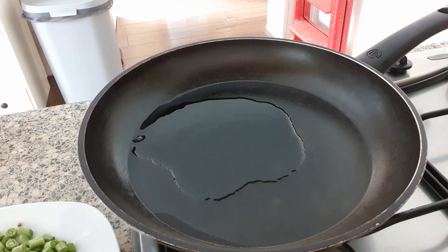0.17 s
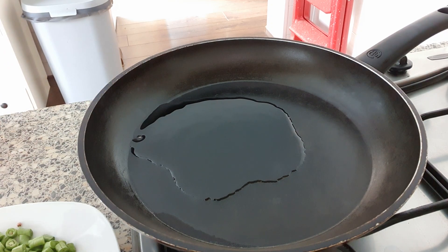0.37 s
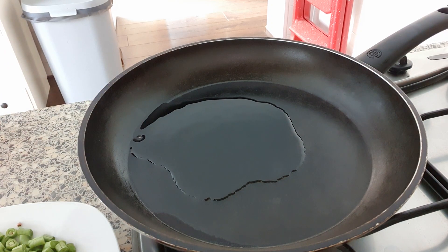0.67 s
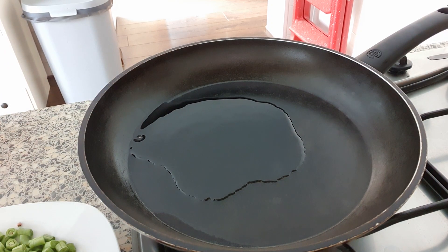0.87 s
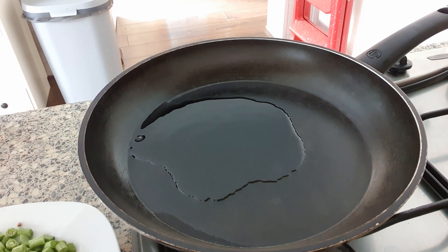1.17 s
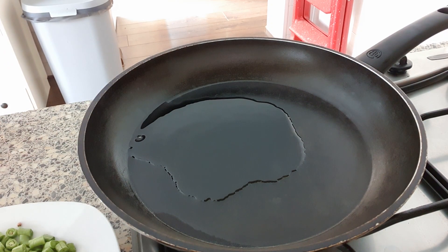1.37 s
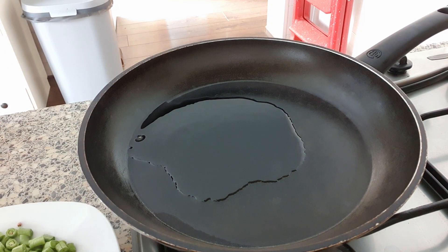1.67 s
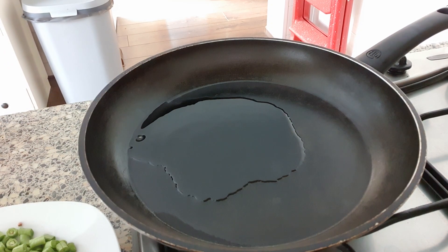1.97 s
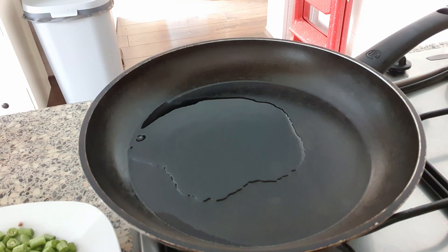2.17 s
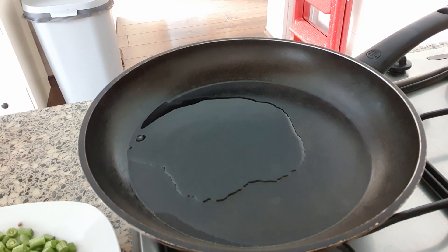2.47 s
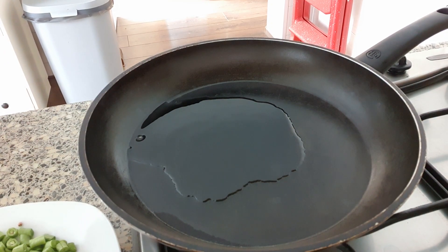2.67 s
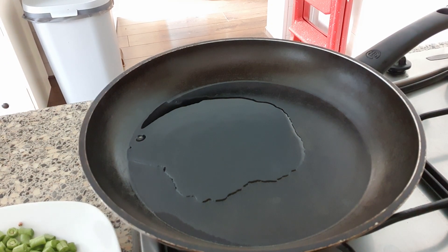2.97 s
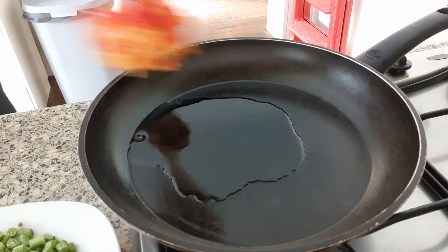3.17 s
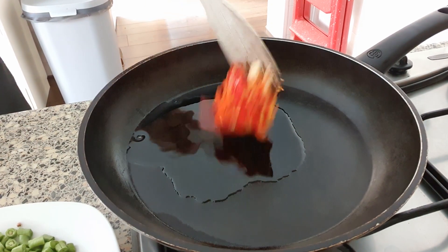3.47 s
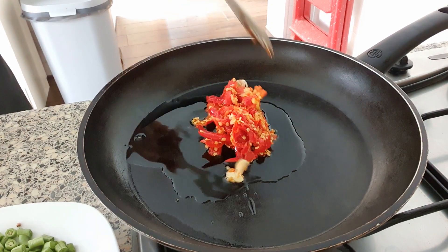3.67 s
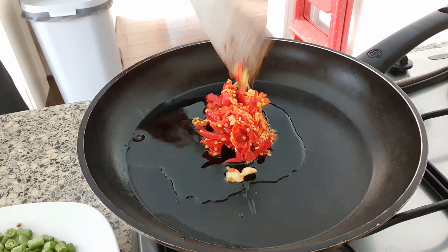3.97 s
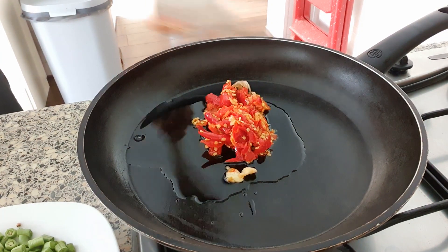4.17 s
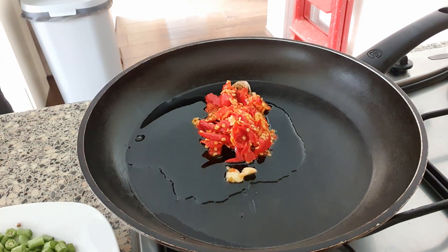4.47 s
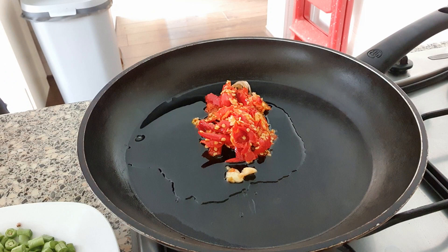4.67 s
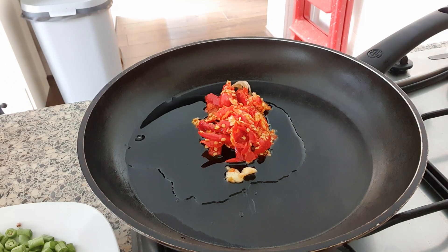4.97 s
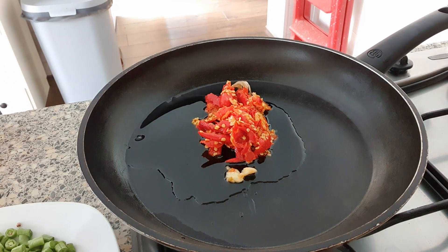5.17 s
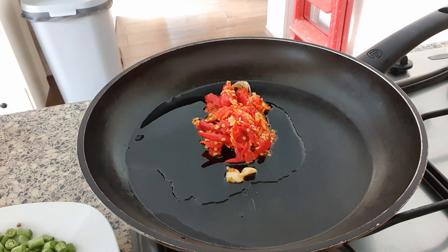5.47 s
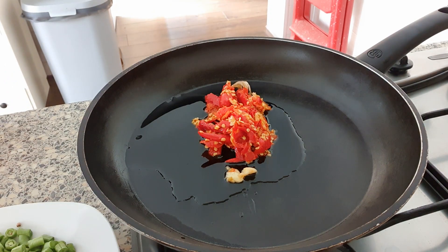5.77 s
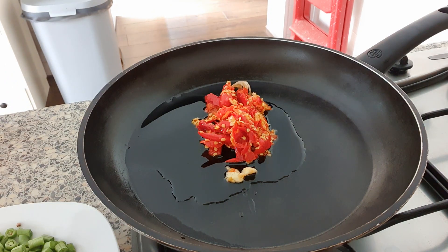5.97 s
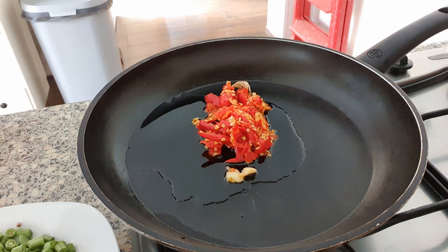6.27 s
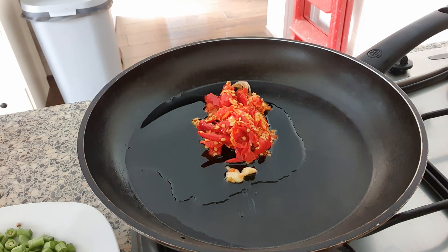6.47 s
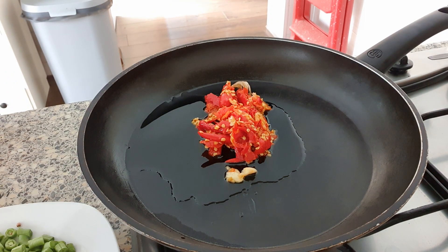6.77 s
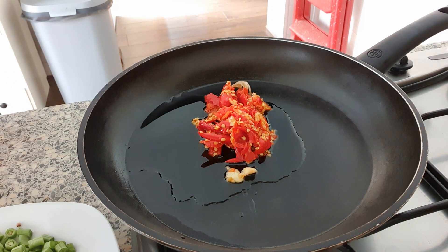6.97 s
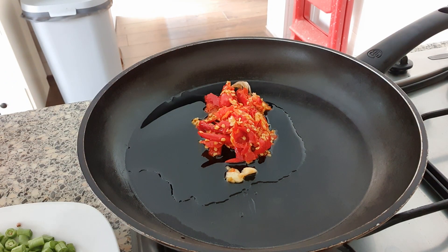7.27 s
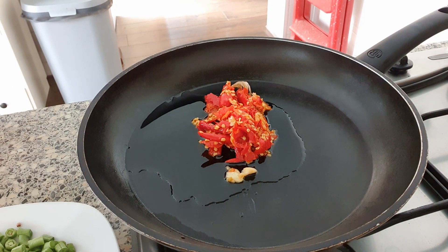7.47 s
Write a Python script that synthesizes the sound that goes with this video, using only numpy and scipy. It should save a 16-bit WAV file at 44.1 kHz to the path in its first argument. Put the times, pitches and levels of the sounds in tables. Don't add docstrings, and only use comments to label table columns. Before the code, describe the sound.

Right at the start a heavy wooden bang breaks into a fast clatter, loud and close. Soft scrapes and distant small taps trail off, leaving thin, coloured gas hiss and a low building rumble. Near the end come about a dozen quick dry knocks with hollow pock-like tones, clinks and brief spoon scrapes, a little left of centre. Two light rubbing strokes fade into hiss. Close stereo pickup in a small reflective kitchen.

```python
import sys
import numpy as np
from scipy import signal
from scipy.fft import rfft, irfft
from scipy.io import wavfile
from scipy.ndimage import uniform_filter1d

SR = 44100
rng = np.random.default_rng(int(sys.argv[2]) if len(sys.argv) > 2 else 0)


def ratio(d):
    e = np.asarray(d, float) / 20
    return 10 ** e


def unload_wav(signal):
    wavfile.write(
        sys.argv[1],
        SR,
        np.round(np.clip(np.atleast_2d(signal).T, -1, 1) * 32767).astype(np.int16),
    )


N = 336042


def evened(x):
    return x / np.sqrt(np.mean(x ** 2) + 1e-20)


def peaked(x, db):
    return ratio(db) * x / abs(x).max()


def read(points, hz, column=1):
    table = np.transpose(points)
    return np.interp(np.log(hz + 1), np.log(table[0] + 1), table[column])


def along(rows, t):
    return np.interp(t, *np.transpose(rows))


def panned(left_minus_right_db):
    return ratio([[left_minus_right_db / 2], [-left_minus_right_db / 2]])


def add(mix, s, sound):
    part = mix[..., max(round(s * SR), 0):][..., :sound.shape[-1]]
    part += sound[..., :part.shape[-1]]


def rings(modes):
    t = np.arange(12000) / SR
    return sum(ratio(db - 60 * t / t60) * np.sin(2 * np.pi * hz * t) for hz, db, t60 in modes)


def wander(count, size):
    return evened(uniform_filter1d(uniform_filter1d(rng.standard_normal(count), size), size))


def pair(shape, alike):
    a, b, c, d = rng.standard_normal((4,) + shape)
    left, other = a + 1j * b, c + 1j * d
    return np.array([left, alike * left + np.sqrt(1 - np.minimum(abs(alike), 1) ** 2) * other])


# (frequency [Hz], width [Hz], left level [dB], right level [dB],
# left-right likeness [0-1], left lead [rad])
JETS = [(644, 94, -87.5, -87, 0.91, 1.26), (1734, 180, -80, -88.5, 0.87, 0.94),
        (3652, 221, -77, -86, 0.39, 2), (5730, 230, -88.5, -96, 0.71, 0.8),
        (6555, 224, -75.5, -81, 0.63, -1.46), (8430, 660, -93.5, -90, 0.31, 0.6),
        (9230, 176, -99, -82, 0.26, 0.5), (9950, 190, -101, -89.5, .2, 7), (10850, 150, -98, -89, 0.84, -3),
        (12320, 160, -87, -87, 0.72, -2.5), (14200, 500, -91, -102.5, .6, 6),
        (14740, 150, -81, -79, 0.65, -5), (15550, 143, -102, -119, 0.61, -13)]
# (frequency [Hz], left level [dB], right level [dB])
VALLEYS = [(301, -93.5, -104), (1100, -100, -106), (2720, -101, -102), (5130, -97, -100), (7500, -99, -99),
           (9680, -105, -98.5), (11800, -102, -97), (13800, -101, -101), (15500, -99, -99)]
# (time [s], gain [dB])
GAIN = [(0, -0.5), (.25, -2), (1.25, -5), (1.82, 1), (2.1, -0.25), (5.4, 0), (7.62, 0)]


def burner():
    hiss_db = -46.5
    frames, hz = N // 128 + 5, np.fft.rfftfreq(512, 1 / SR)
    power = ratio([read(VALLEYS, hz, column=1), read(VALLEYS, hz, column=2)]) ** 2
    shared = np.zeros(len(hz), complex)
    for centre, width, left_db, right_db, alike, lead in JETS:
        hump = (1 + ((hz - centre) / width) ** 2) ** -2
        power += ratio([[left_db], [right_db]]) ** 2 * hump
        shared += ratio(left_db + right_db) * hump * alike * np.exp(-1j * lead)
    likeness = shared / np.sqrt(power[0] * power[1])
    z = pair((len(hz), frames), likeness[:, None]) * np.sqrt(power)[:, :, None]
    patches = uniform_filter1d(rng.standard_normal((len(hz), frames)), size=6, axis=0)
    patches = evened(uniform_filter1d(patches, size=16, axis=1))
    z *= ratio(0.7 * patches + 0.72 * wander(frames, size=8)) * (hz > 200)[:, None]
    hiss = evened(signal.istft(z, nperseg=512, noverlap=384)[1][:, :N])
    return hiss * ratio(hiss_db + along(GAIN, np.arange(N) / SR))


# (time [s], peak level [dB], contact [ms], crack level [dB])
DOOR = [(.002, -19.5, 3, -34), (0.033, -13.5, 4.4, -40), (0.0467, -10.5, 1.3, -20.5), (.051, -2, 1.56, -34),
        (0.057, -14, 2, -40), (0.0689, -7.5, 1.22, -42), (.097, -5.5, 1.63, -29), (.104, -13.5, 1.95, -26),
        (0.129, -14, 1.5, -38), (0.14, -23.5, 1.4, -37), (0.189, -17, 1.37, -37), (0.241, -32, 4, -47),
        (.33, -38.5, 2.7, -39)]
# (time [s], peak level [dB], contact [ms], crack level [dB])
SPOON = [(4.927, -25.5, 2.1, -43.5), (5.004, -25.5, 1.63, -27), (5.2407, -18, 1.4, -45),
         (5.249, -29, 2, -50), (5.29, -23.5, 3.5, -33), (5.475, -19, 0.53, -28), (5.51, -27, 2.8, -56),
         (5.566, -26, 1.8, -56), (5.6, -32, 2.8, -35), (5.768, -14.5, 0.84, -8), (5.819, -21, 1.4, -43),
         (5.846, -22, 1.84, -31)]
# (time [s], peak level [dB], contact [ms])
TAPS = [(.585, -44.5, 2.7), (0.845, -40.5, 1.8), (.988, -44, 1.4), (1.729, -44.5, 3.7), (1.853, -39, 7.6),
        (2.17, -46, 1.6), (2.687, -43, 3.9), (2.931, -40, 1.7), (6.457, -42, 3.9)]
# (frequency [Hz], level [dB], t60 [s])
WORKTOP = [(111, -17, 0.075), (151.2, -3, 0.15), (222, -3.5, 0.1), (314, -5, 0.085), (371.7, 3.5, 0.058),
           (476.4, -7.5, 0.22), (697, -3.5, 0.12), (790, -12, 0.16), (860, 1.5, 0.1)]
# (frequency [Hz], level [dB])
CRACK = [(600, -47), (1000, 11), (1400, -1.5), (2000, 8.5), (2600, 3), (3500, 3), (4800, -6.5), (6500, -22),
         (9000, -11), (12000, -30), (16000, -55)]


def thuds():
    door_pan_db, tap_pan_db, spoon_pan_db = 3.5, 2, 3
    tap_crack_db, crack_loss_db_per_ms = -3, 2.5
    right_delay_s = 0.00037
    out, t = np.zeros((2, N)), np.arange(4096) / SR
    colour = ratio(read(CRACK, np.fft.rfftfreq(4096, 1 / SR)))
    body = 0.0055 * rings(WORKTOP) + signal.unit_impulse(12000)
    band = signal.butter(2, [85, 1000], "bandpass", fs=SR, output="sos")
    blows = [(*row, door_pan_db) for row in DOOR] + [(*row, spoon_pan_db) for row in SPOON]
    for s, db, contact_ms in TAPS:
        crack_db = db + tap_crack_db - crack_loss_db_per_ms * contact_ms
        blows.append((s, db, contact_ms, crack_db, tap_pan_db))
    for s, db, contact_ms, crack_db, pan_db in blows:
        push = np.hanning(round(contact_ms * SR / 1000) + 3)
        thud = peaked(signal.sosfilt(band, signal.oaconvolve(push, body)), db)
        add(out[0], s, thud * ratio(pan_db / 4))
        add(out[1], s + right_delay_s, thud / ratio(pan_db / 4))
        burst = irfft(rfft(rng.standard_normal((2, 4096))) * colour)
        burst *= (1 - np.exp(-t / 0.00014)) * (np.exp(-t / 0.0041) + 0.13 * np.exp(-t / 0.019))
        add(out, s, peaked(burst, crack_db) * panned(pan_db))
    return out


# (time [s], peak level [dB], hardness [dB/octave])
WALL_HITS = [(.048, -23.5, -6.5), (.095, -43, 1.5), (5.004, -33.5, 4), (5.242, -45, -12), (5.29, -38, -6),
             (5.477, -26.5, -11), (5.484, -32, -24), (5.519, -34.5, -19), (5.767, -18.5, 11),
             (5.783, -31, -12), (5.83, -33, 7)]
# (frequency [Hz], level [dB], t60 [s])
CLINK = [(825, -5.5, 0.059), (1120, -4, 0.086), (1350, 3, 0.14), (1900, 14.5, 0.036), (2126, 5, 0.13),
         (2360, -13, 0.074), (2830, -14, 0.067), (3036, 2.5, 0.08), (3250, 2, 0.057), (4130, 0, 0.071),
         (4770, -17, .06), (5600, -11.5, 0.047)]


def wall():
    out, contact = np.zeros((2, N)), np.exp(-np.arange(500) / SR / 0.0023)
    for s, db, hard_db in WALL_HITS:
        modes = [(hz, level + hard_db * np.log2(hz / 1900), t60) for hz, level, t60 in CLINK]
        clink = rings(modes)
        for side in out:
            grit = contact * rng.standard_normal(500)
            add(side, s, peaked(signal.oaconvolve(clink, grit), db))
    return out * panned(3)


# (time [s], peak level [dB], time to peak [s], left minus right [dB])
AIR = [(.049, -12, 0.0037, 6.5), (.094, -28, 0.011, 8), (.844, -43.5, .006, 13), (4.925, -41, 0.0096, 10),
       (5.003, -29.5, .011, 5), (5.2415, -28, 0.0097, 11), (5.481, -11, .012, 9), (5.545, -24.5, 0.0077, 0),
       (5.59, -34, .0078, -4), (5.769, -17, .012, -2), (5.81, -27, 0.014, -3), (5.84, -28, 0.0084, 7),
       (6.0, -49.5, 0.02, 7), (6.04, -42.5, 0.013, 3), (6.19, -53, 0.0046, 3.5), (6.29, -55, 0.0091, 5),
       (6.4, -54, 0.014, 5)]
# (time [s], peak level [dB], frequency [Hz])
PANELS = [(.002, -35.5, 630), (.048, -19, 105), (.05, -31, 85), (.05, -19, 790), (.062, -20.5, 713),
          (.096, -30, 860), (.585, -47.5, 151), (.844, -44.5, 474), (.988, -48, 650), (.988, -49.5, 477),
          (1.844, -44, 99.5), (2.17, -52, 596), (2.69, -53.5, 690), (2.93, -53, 710), (3.545, -55, 760),
          (5.476, -23.5, 567), (5.5, -39, 143), (5.56, -31, 145.6), (5.769, -25.5, 825), (6.465, -47, 100),
          (7.129, -52, 103)]


def notes():
    air_hz, panel_pan_db = 586.4, 0.5
    panel_rise_s, rise_law = 0.006, -0.67
    out, t = np.zeros((2, N)), np.arange(8000) / SR
    swells = [(s, db, air_hz, rise, pan_db) for s, db, rise, pan_db in AIR]
    for s, db, hz in PANELS:
        swells.append((s, db, hz, panel_rise_s * (hz / 600) ** rise_law, panel_pan_db))
    for s, db, hz, rise, pan_db in swells:
        u = t / (rise * np.array([[1], [.75]]))
        note = u * np.exp(1 - u) * np.sin(2 * np.pi * hz * t - np.array([[0], [.7]]))
        add(out, s, note * ratio(db) * panned(pan_db))
    return out


# (time [s], length [s], level [dB], brightness [dB/octave], top [Hz])
SCRAPES = [(0.046, 0.16, -48.5, -18.5, 6000), (0.209, 0.15, -56.5, 1, 4960),
           (0.303, 0.16, -50.5, -1.5, 5600), (0.584, 0.14, -57.5, 3, 5000), (2.897, 0.1, -60, -1.5, 6000),
           (3.525, .08, -52.5, -.8, 13000), (4.919, 0.03, -50.5, -1, 6000),
           (4.982, 0.083, -40.5, -2.5, 12000), (5.27, .11, -44.5, -1, 12000),
           (5.561, 0.081, -49, -2.5, 9000), (5.804, .1, -41, -4.5, 10000), (5.869, 0.33, -52, 1.5, 5540),
           (6.1, 0.34, -54.5, 2.5, 5460)]
# (frequency [Hz], level [dB], t60 [s])
BOWL = [(590.3, -7, 0.093), (1391, -15.5, 0.12), (1910, -26, 0.03), (1150, -42, 0.13)]


def scrapes():
    clump_db = 3
    ring_db, ring_slope = -40.5, 1.41
    out, bowl = np.zeros((2, N)), rings(BOWL)
    for s, length, db, tilt_db, top_hz in SCRAPES:
        u = np.linspace(0, 1, round(length * SR))
        stroke = np.sin(np.pi * u ** .6) ** 1.08
        slip_db = 1.5 * rng.exponential(1, len(u)) + clump_db * wander(len(u), size=120)
        slips = rng.standard_normal((2, len(u))) * ratio(slip_db) * stroke
        hz = np.fft.rfftfreq(len(u), 1 / SR)
        colour = ratio(tilt_db * np.log2(hz / 3000 + 0.014))
        colour = colour / (1 + (1330 / (hz + 1)) ** 8) / (1 + (hz / top_hz) ** 4)
        add(out, s, evened(irfft(rfft(slips) * colour, len(u))) * ratio(db) * panned(3.6))
        ring = signal.oaconvolve(slips[0], bowl)
        add(out, s, peaked(ring, ring_db + ring_slope * (db + 45.5)) * panned(5))
    return out


# (frequency [Hz], t60 [s])
KITCHEN = [(80, 0.55), (250, 0.34), (700, 0.36), (2000, 0.32), (5000, 0.19), (12000, 0.14)]
# (frequency [Hz], left-right likeness [0-1])
ALIKE = [(60, 0.96), (200, 0.88), (350, 0.97), (550, 0.4), (900, 0.42), (3000, 0.069)]


def kitchen(x):
    taps = np.zeros((2, 30000))
    at = np.arange(260, 29900, 20) + rng.integers(0, 20, (2, 1482))
    np.put_along_axis(taps, at, rng.choice([-1., 1.], at.shape), 1)
    hz, t, z = signal.stft(taps, SR, nperseg=512)
    alike = np.clip(read(ALIKE, hz), 0, 1)[:, None]
    z[1] = alike * z[0] + np.sqrt(1 - alike ** 2) * z[1]
    decay = ratio(-60 * t / read(KITCHEN, hz)[:, None])
    tail = signal.istft(z * decay, SR, nperseg=512)[1]
    return signal.fftconvolve(x, tail / np.linalg.norm(tail[0]), axes=1)[:, :N]


# (frequency [Hz], level [dB per Hz])
RUMBLE_SHAPE = [(15, -35), (25, 3), (54, -2.5), (94, 4), (124, -6), (190, -10.5), (239, -14.5), (271, -15),
                (303, -15), (500, -26.5), (650, -54), (1100, -120)]
# (time [s], level [dB])
STIR = [(.5, 3), (.8, 1), (1.02, 4), (1.2, -3), (1.9, -0.5), (2.6, 0), (2.88, 7.5), (3.2, 0), (3.9, 2),
        (4.1, 3.5), (4.6, -1), (4.95, -5.5), (5.3, 4), (5.6, 3), (6.0, 2.5), (6.5, -2), (7.1, -4.5),
        (7.62, -1)]
# (frequency [Hz], rms level [dB], waver [dB])
HUM = [(49.2, -53.5, 1.5), (244.4, -67, 3.5), (309, -74.5, 1), (803, -79, 6)]


def rumble():
    rumble_db, roar_db = -58.5, -62.5
    roar_follows = 0.77
    frames, hz, t = N // 512 + 5, np.fft.rfftfreq(2048, 1 / SR), np.arange(N) / SR
    z = pair((len(hz), frames), read(ALIKE, hz)[:, None]) * ratio(read(RUMBLE_SHAPE, hz))[:, None]
    deep = 1 / (1 + (hz / 135) ** 6)[:, None]
    lumps = z * deep * ((hz > 58) + .12)[:, None] * ratio(1.5 * wander(frames, size=3))
    roar = z * (1 - deep) * ratio(0.99 * wander(frames, size=5))
    lumps, roar = (evened(signal.istft(part, nperseg=2048, noverlap=1536)[1][:, :N]) for part in (lumps, roar))
    gain_db, stir_db = along(GAIN, t), along(STIR, t)
    low = lumps * ratio(rumble_db + stir_db) + roar * ratio(roar_db + roar_follows * stir_db)
    low *= ratio(gain_db)
    for line_hz, db, waver_db in HUM:
        line = np.sqrt(2) * np.sin(2 * np.pi * line_hz * t + .25 * wander(N, size=3000))
        low += line * ratio(db + gain_db + waver_db * wander(N, size=2500)) * panned(-1.2)
    return low


def worktop_dip(x):
    centre_hz, width_hz, depth_db = 1200, 43, -6
    hz = np.fft.rfftfreq(1024, 1 / SR)
    dip = np.fft.fftshift(irfft(ratio(depth_db / (1 + ((hz - centre_hz) / width_hz) ** 2))))
    return signal.oaconvolve(x, dip[None])[:, 512:N + 512]


def scene():
    near, bowl = thuds() + wall() + scrapes(), notes()
    room = kitchen(ratio(-4.5) * near + ratio(-16.5) * bowl)
    return worktop_dip(near + bowl + room) + burner() + rumble()


def roll_off(x):
    return signal.sosfilt(signal.butter(12, 15780, fs=SR, output="sos"), x)


def record(dry):
    cut = signal.sosfilt(signal.butter(2, 30, "highpass", fs=SR, output="sos"), dry)
    return roll_off(np.clip(cut, -1, 1))


dry = scene()
out = record(dry)
unload_wav(out)
```